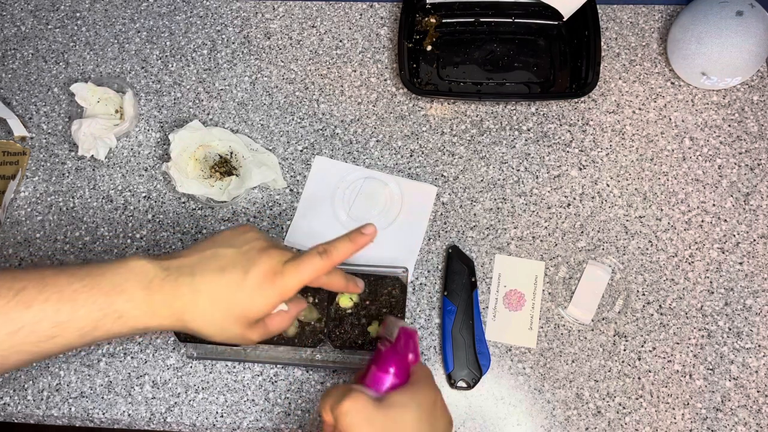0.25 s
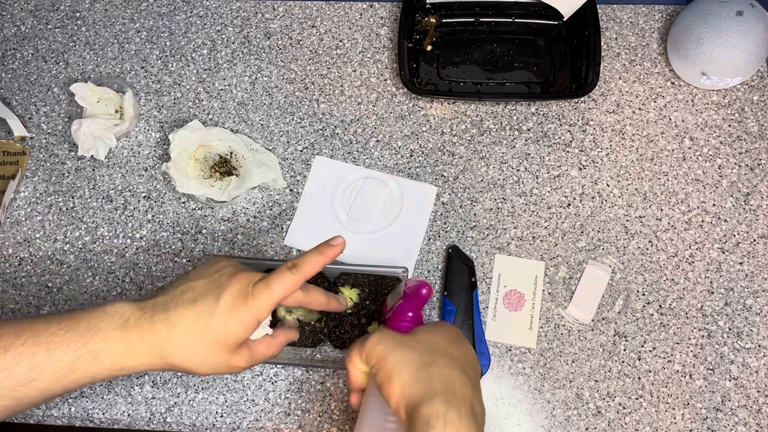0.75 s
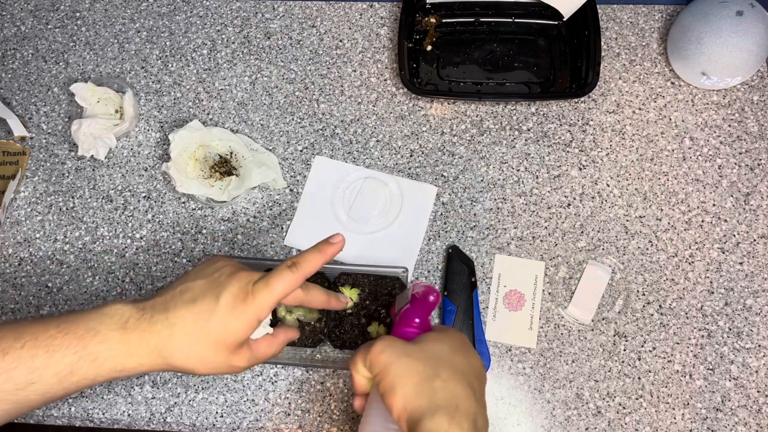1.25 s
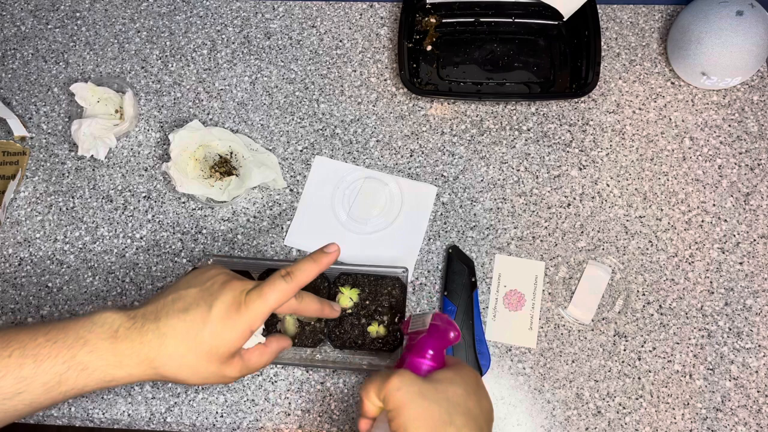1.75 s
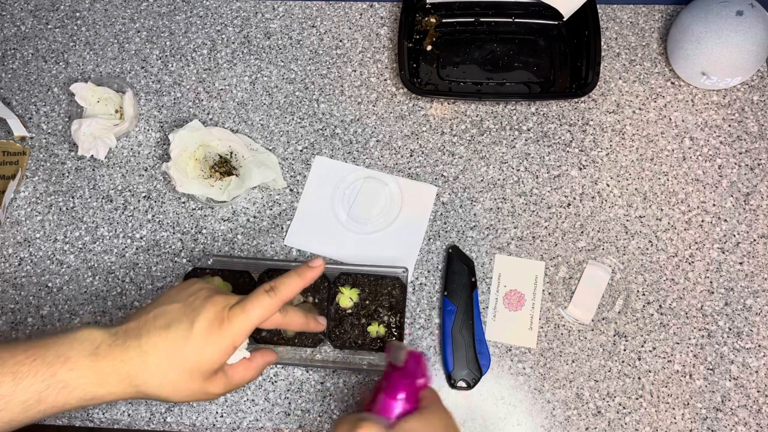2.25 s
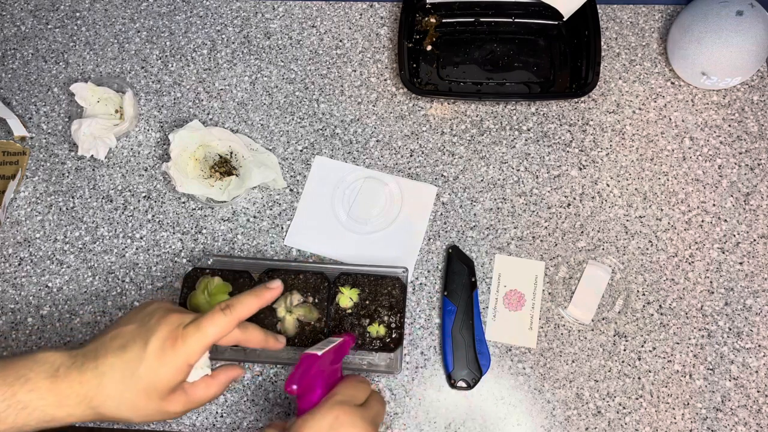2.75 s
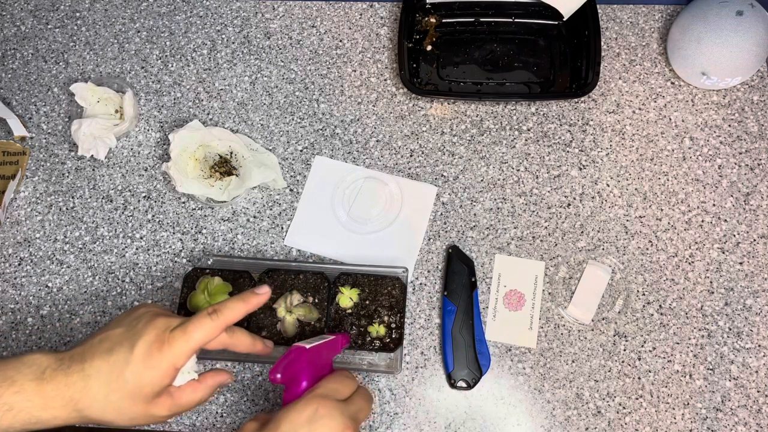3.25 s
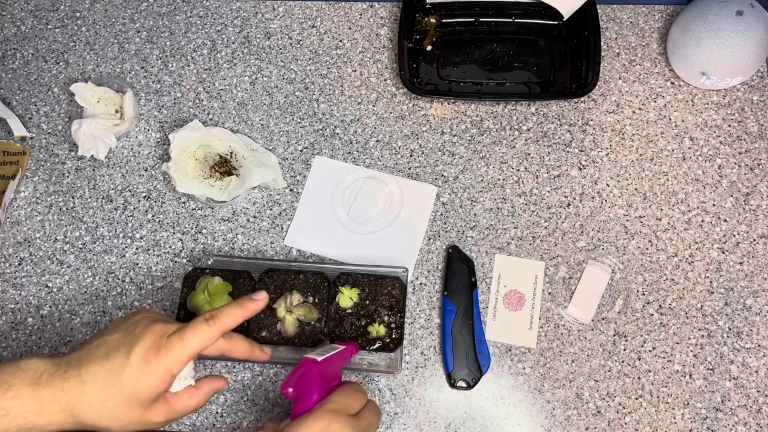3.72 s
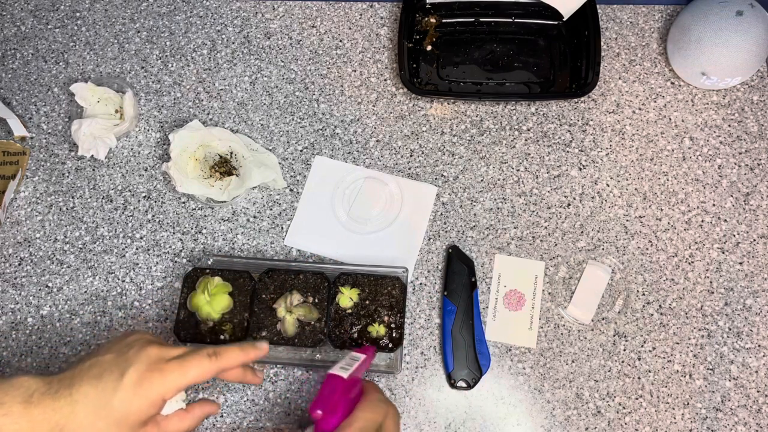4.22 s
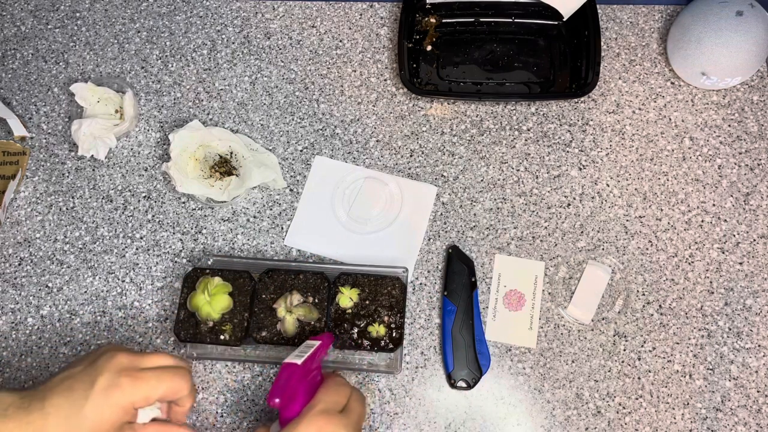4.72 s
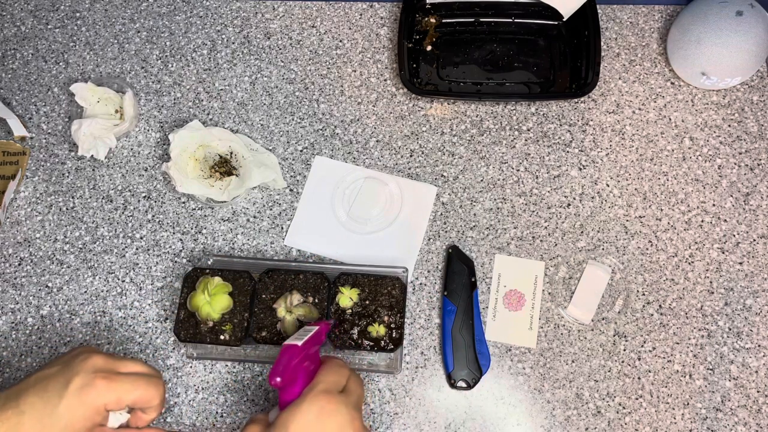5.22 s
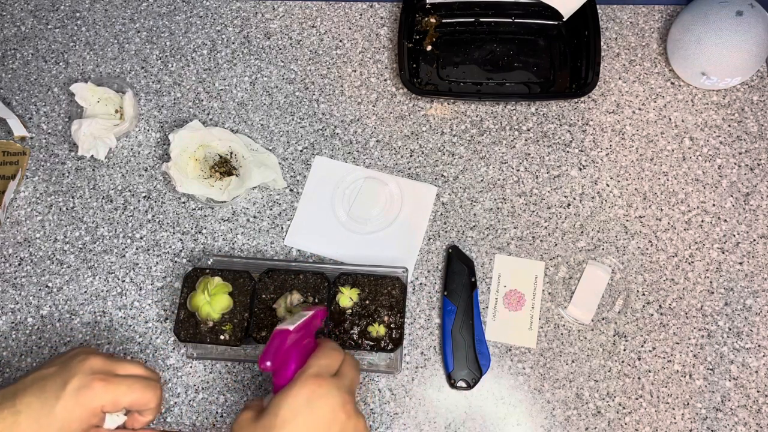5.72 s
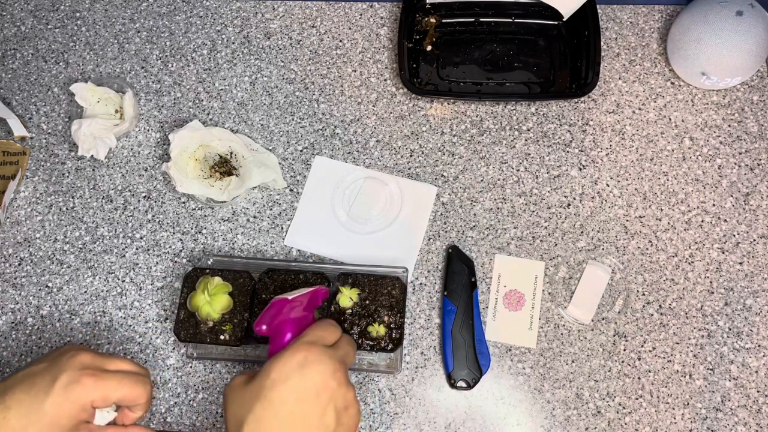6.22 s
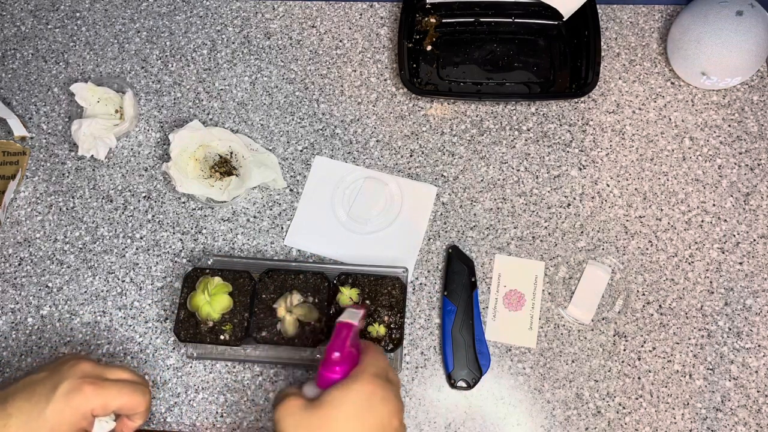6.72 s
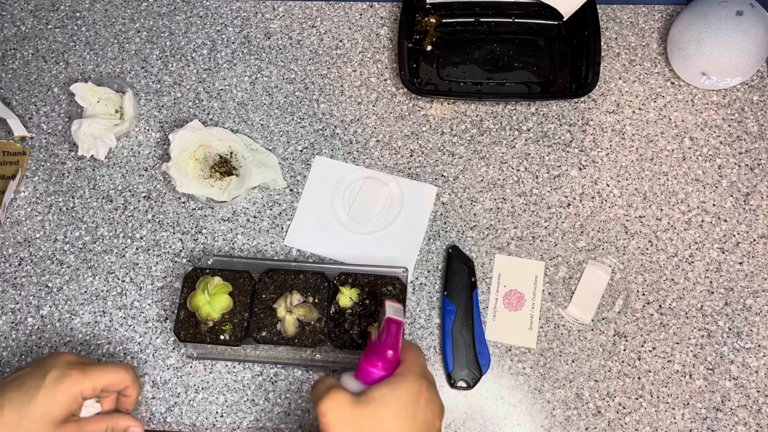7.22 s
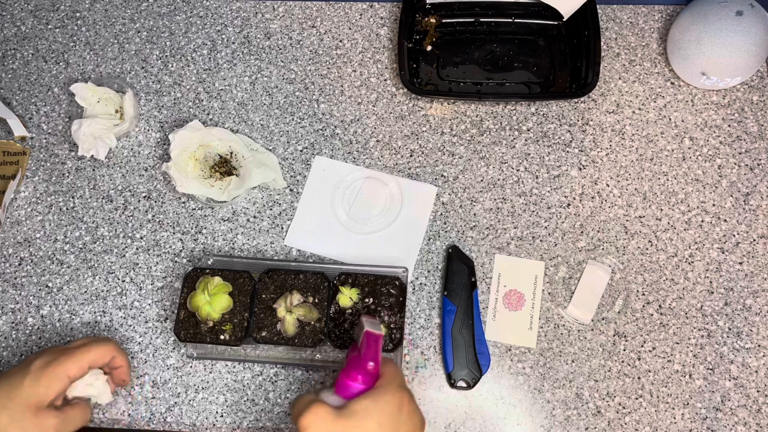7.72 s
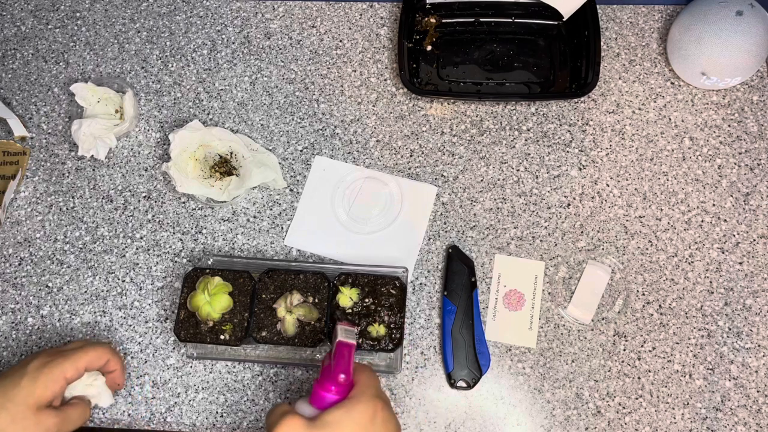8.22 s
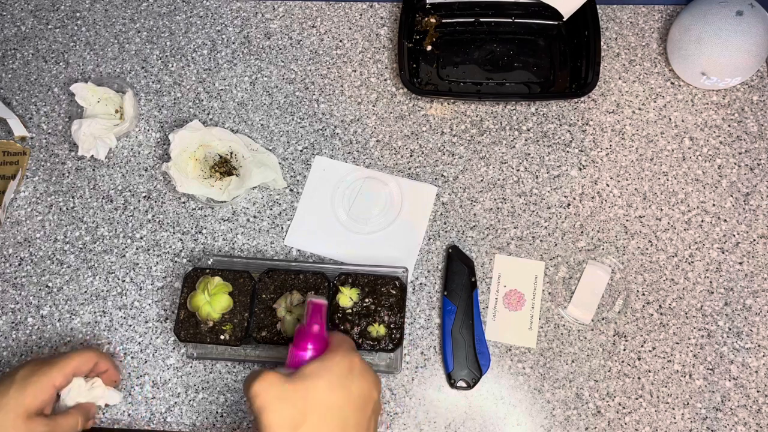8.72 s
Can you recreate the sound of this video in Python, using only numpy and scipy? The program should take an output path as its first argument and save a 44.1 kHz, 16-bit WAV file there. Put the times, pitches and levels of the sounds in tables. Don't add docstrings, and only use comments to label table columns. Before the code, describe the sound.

Squeaky, clacking spray-bottle pulls hiss and patter on soil in a small room, with intermittent cricket chirps and a quiet mains hum behind.

```python
import sys
import numpy as np
from scipy import signal
from scipy.fft import rfft, irfft, next_fast_len
from scipy.io import wavfile
from scipy.ndimage import uniform_filter1d, map_coordinates

SR = 44100
rng = np.random.default_rng(int(sys.argv[2]) if len(sys.argv) > 2 else 0)


def master(y):
    cut = np.clip(np.atleast_2d(y).T, -1, 1)
    pcm = np.round(cut * 32767)
    wavfile.write(sys.argv[1], SR, pcm.astype(np.int16))


def invert_db(x):
    u = np.asarray(x, float) / 20
    return 10 ** u


N = 395123

# first slip in seconds, its peak level in dB,
# wait for the second slip in seconds, its peak level in dB.
SLIPS = [(0.9026, -39, 0.023, -44.5), (1.1981, -34.5, 0.022, -52), (1.521, -41.5, 0.014, -59),
         (1.867, -43.5, 0.017, -58), (2.903, -42.5, 0.015, -46.5), (3.2243, -41, 0.018, -44),
         (3.5181, -39.5, 0.017, -38.5), (3.842, -40, 0.017, -48), (4.8422, -46.5, 0.019, -49),
         (5.1598, -43, 0.015, -43), (5.4436, -41, 0.018, -38.5), (5.722, -43, 0.015, -46),
         (6.0872, -41.5, 0.018, -43.5), (6.441, -44, .018, -38.5), (6.7372, -40, .0173, -38.5),
         (7.0036, -38.5, 0.017, -35), (7.279, -39, .015, -38.5), (7.5443, -39.5, 0.014, -37.5),
         (7.819, -38.5, 0.015, -38), (8.0664, -39, .014, -37.5), (8.5, -48.5, 0.012, -49),
         (8.8054, -35, 0.018, -36)]
PUMP_HZ = 1892


def unit(x):
    return x / np.sqrt(np.mean(x ** 2) + 1e-20)


def along(points, hz):
    f, v = np.transpose(points)
    return np.interp(np.log(hz + 1), np.log(f + 1), v)


def uneven(knots):
    return map_coordinates(rng.standard_normal(size=40), [knots + 2])


def wobble(rate):
    return map_coordinates(rng.standard_normal(size=N // 40), [np.arange(N) * rate / SR])


def filtered(x, response):
    m = next_fast_len(N + SR // 2)
    return irfft(rfft(x, m) * response(np.fft.rfftfreq(m, 1 / SR)), m)[..., :N]


def patchy(x, depth_db):
    z = signal.stft(x, nperseg=256)[2]
    field = rng.standard_normal(z.shape[-2:])
    field = uniform_filter1d(uniform_filter1d(field, size=4, axis=0), size=9, axis=1)
    return signal.istft(z * invert_db(depth_db * unit(field)), nperseg=256)[1][..., :N]


def add(track, s, x):
    part = track[round(s * SR):][:len(x)]
    part += x[:len(part)]


def resonance(hz, centre, width):
    return 1j * hz * width / (centre * centre - hz * hz + 1j * hz * width)


def shell(hz, lift_db):
    # centre in Hz, width in Hz, level in dB.
    modes = [(1476, 50, -8), (1913, 137, -0.5), (2371, 230, -9.5), (3680, 110, -16), (5855, 400, 0),
             (7445, 42, -0.5), (7850, 24, -9), (9140, 37, -4), (10250, 470, -4)]
    return 1 + sum(invert_db(db + lift_db) * resonance(hz, centre, width) for centre, width, db in modes)


def hollow(hz):
    # centre in Hz, width in Hz, level in dB.
    modes = [(620, 120, -31), (1564, 180, 13), (3030, 930, 9.5)]
    return sum(invert_db(db) * resonance(hz, centre, width) for centre, width, db in modes)


def cornered():
    return np.clip((2.4 - np.arange(N) / SR) / .3, 0, 1)


def diffuse(pair):
    # frequency in Hz, correlation from 0 to 1.
    alike = [(60, .99), (170, .92), (350, .75), (700, .3), (2000, .5), (6000, .3), (8500, .9)]

    def turn(f):
        return np.arccos(np.clip(along(alike, f), -1, 1)) / 2

    mid, side = filtered(pair, lambda f: np.array([np.cos(turn(f)), np.sin(turn(f))]))
    return np.array([mid + side, mid - side])


def walls(x, longer):
    # frequency in Hz, 60 dB decay time in seconds.
    decay = [(300, 0.38), (2000, 0.22), (5000, 0.19), (10000, 0.15)]
    wet, step = np.zeros((2, N + SR)), SR // 4
    for start in range(0, N, step):
        noise = rng.standard_normal((2, SR // 3))
        if not x[start:start + step].any():
            continue
        hz, t, z = signal.stft(noise, SR, nperseg=256)
        fade = invert_db(-60 * t / longer / along(decay, hz)[:, None])
        tail = signal.istft(z * fade, SR, nperseg=256)[1]
        tail = tail / np.linalg.norm(tail[0])
        answer = signal.fftconvolve(x[None, start:start + step], tail, axes=1)
        wet[:, start + 120:][:, :answer.shape[1]] += answer
    return wet[:, :N]


def room_tone():
    # time in seconds, frequency in Hz, level in dB.
    drift = [(0.0, 57, -57), (0.05, 58.2, -49.5), (0.85, 59, -52.5), (8.96, 58.73, -52)]
    # frequency in Hz, level in dB.
    air_spectrum = [(25, -37), (45, -4.5), (70, -13), (125, -12), (200, -22), (300, -16), (400, -21),
                    (700, -32.5), (1100, -42), (2000, -47.5), (4000, -54.5), (9000, -58), (10000, -47),
                    (16000, -73)]
    s, hz, db = np.transpose(drift)
    t = np.arange(N) / SR
    level = invert_db(np.interp(t, s, db) + 0.41 * wobble(1.41) + 1.5 * wobble(30))
    hum = np.sqrt(2) * level * np.sin(2 * np.pi * np.cumsum(np.interp(t, s, hz)) / SR)
    air = filtered(rng.standard_normal((2, N)), lambda f: invert_db(along(air_spectrum, f)))
    return hum + unit(diffuse(air)) * invert_db(-58.5 + 0.1 * wobble(15.0))


def cricket():
    # start in seconds, peak level in dB.
    strokes = [(0.5077, -45.5), (1.171, -41.5), (1.216, -36), (1.2752, -34.5), (1.653, -40), (1.6998, -34),
               (1.7603, -33.5), (2.972, -43.5), (3.022, -34.5), (3.094, -39.5), (4.189, -43.5),
               (4.242, -35.5), (4.301, -36), (5.8593, -44.5), (5.917, -35.5), (5.9848, -39.5),
               (6.8066, -42.5), (6.855, -34), (6.916, -34), (8.605, -44.5), (8.814, -42.5)]
    song, rasp = np.zeros((2, N))
    t = np.arange(SR // 40) / SR
    for s, db in strokes:
        effort = np.clip((db + 42.5) / 7, 0, 1)
        teeth, slip = uneven(t * 650), uneven(t * 650)
        hz = 4420 + 60 * effort + 90 * slip
        hz = hz + (110 + 640 * effort) * np.exp(-t / .008) + 400 * effort * np.exp(-t / .0025)
        turn = 2 * np.pi * np.cumsum(hz) / SR
        rise_s, fall_s = 0.0032 + 0.0032 * effort, 0.0066 * (0.7 + 0.83 * effort)
        swell = np.clip(t / rise_s, 0, 1) ** 0.85 * np.exp(-(np.clip(t - rise_s, 0, None) / fall_s) ** 2)
        octave = invert_db(-5.0) * np.clip(t / 0.0038, 0, 1) * np.sin(2 * turn)
        beat = 1 - 0.8 * effort * np.exp(-((t - 0.01095) / 0.00082) ** 2)
        scratch = invert_db(-17.5) * rng.standard_normal(len(t))
        add(song, s, invert_db(db - 4.0) * invert_db(2.3 * teeth) * swell * beat * (np.sin(turn) + octave))
        add(rasp, s, invert_db(db) * (0.48 * swell + np.exp(-((t - .0015) / 0.0019) ** 2)) * scratch)
        opening = np.exp(-((t - .011) / 0.006) ** 2) * rng.standard_normal(len(t))
        add(rasp, s - .035, invert_db(-61.0) * opening)
    ending = np.sin(2 * np.pi * 4600 * t) + 0.75 * np.sin(2 * np.pi * 9200 * t)
    add(song, 0, invert_db(-67.0 - 60 * t / 0.089) * ending)
    return song + filtered(rasp, lambda f: resonance(f, 7400, 2000) ** 2)


def sliding():
    # time in seconds, level in dB.
    shifts = [
        [(2.13, -77), (2.33, -72.5), (2.48, -80)],
        [(8.31, -100), (8.5, -69)],
        [(4.72, -79), (4.83, -93)],
        [(5.6, -70), (5.72, -81)],
        [(5.3, -91), (5.44, -63)],
    ]
    gain = np.zeros(N)
    for shift in shifts:
        s, db = np.transpose(shift)
        t = np.arange(s[0], s[-1], 1 / SR)
        edge = np.clip(np.minimum((t - t[0]) / 0.0054, (t[-1] - t) / 0.049), 0, 1)
        add(gain, t[0], edge * invert_db(np.interp(t, s, db)))
    return gain


def hand():
    # centre in seconds, level in dB, frequency in
    # Hz.
    bottom_outs = [(0.96, -52.5, 230), (0.958, -56, 646), (1.225, -58, 650), (1.262, -54, 670),
                   (1.245, -56, 200), (1.28, -53, 202), (1.57, -59, 620), (1.584, -67, 170), (1.932, -53, 156),
                   (2.94, -58, 244), (3.287, -54, 141), (3.569, -51, 125), (3.894, -51, 135),
                   (4.882, -46.5, 137), (5.211, -50, 148), (5.505, -50.5, 138.6), (5.761, -53.5, 126),
                   (6.131, -53.5, 149), (6.497, -54, 149), (6.782, -52, 133), (7.054, -52.5, 145),
                   (7.311, -55.5, 143.6), (7.606, -49.5, 132), (7.88, -53, 138.6), (8.101, -54, 132),
                   (8.531, -58, 156), (8.914, -51, 143)]
    thuds = np.zeros(N)
    t = np.arange(-SR // 16, SR // 16) / SR
    for s, db, hz in bottom_outs:
        overtone = np.sin(2 * np.pi * 1.937 * hz * t + rng.uniform(0, 7.9))
        sway = np.sin(2 * np.pi * hz * t) + 0.28 * overtone
        sway = sway * (1 + .6 * uneven((t - t[0]) * 120))
        add(thuds, s + t[0], invert_db(db - 1.5) * np.exp(-(t / 0.022) ** 2) * sway)

    def skin_band(f):
        square = (f / 1500) ** 2
        return square / (1 + square) / (1 + (f / 2400) ** 16)

    skin = filtered(rng.standard_normal(N), skin_band)
    return thuds + invert_db(-4.0 + 0.44 * wobble(42)) * sliding() * unit(skin)


def taps():
    # start in seconds, level in dB, centre in Hz, width in Hz.
    ticks = [(0.316, -60.5, 1820, 600), (0.359, -57, 9900, 2500), (0.375, -67, 5700, 2000),
             (.382, -52, 5060, 1520), (0.4412, -48, 3400, 2000), (0.444, -56, 1900, 800),
             (0.455, -49.5, 7400, 2000), (.492, -55, 2330, 350), (.5065, -52, 1800, 500),
             (.5245, -60, 6500, 2000), (0.537, -52, 1680, 600), (0.84, -66, 2600, 2500),
             (1.756, -53, 7500, 2000), (1.81, -61, 2600, 2500), (1.958, -51, 5500, 400),
             (1.967, -55, 5400, 400), (0.8177, -51, 1620, 500), (2.7507, -59, 1900, 500),
             (2.7641, -57, 1900, 450), (4.065, -55, 3000, 3000), (7.425, -54, 1900, 500),
             (7.692, -53, 1900, 500), (1.0815, -48, 6000, 500), (1.386, -54, 5900, 500),
             (3.695, -50, 6070, 500), (8.705, -51, 5950, 500), (1.9875, -55, 1800, 600),
             (3.272, -51, 3770, 500), (6.825, -51, 2600, 2500), (7.634, -56, 3000, 2500),
             (7.654, -59, 2500, 2500), (.6894, -55, 7300, 2500), (1.4264, -51, 6540, 4020),
             (2.1363, -54.5, 1930, 700), (2.28, -53, 5000, 2500), (2.358, -55.5, 3120, 1010),
             (2.4068, -63, 2980, 3000), (2.4626, -61.5, 5000, 3500), (2.4864, -48.5, 1010, 700),
             (3.1505, -52, 5600, 1500), (4.017, -54, 6010, 1200), (4.06, -46.5, 2930, 1500),
             (7.485, -58.5, 7300, 4030), (8.7366, -48.5, 5600, 3000), (8.7915, -73, 7400, 800)]
    out, t = np.zeros(N), np.arange(SR // 12) / SR
    for s, db, hz, width_hz in ticks:
        b, a = signal.iirpeak(hz, hz / width_hz, SR)
        burst = rng.standard_normal(len(t)) * (np.exp(-(t / 0.0017) ** 2) + invert_db(-9 - 60 * t / 0.069))
        burst = signal.lfilter(b, a, signal.lfilter(b, a, burst))
        add(out, s, invert_db(db) * burst * 9 / np.linalg.norm(burst[:SR // 150]))
    return out


def thumps():
    # centre in seconds, peak level in dB.
    blips = [(0.9258, -44), (0.9393, -43), (0.9502, -54), (0.9584, -46), (0.966, -45), (1.2193, -37),
             (1.2287, -48), (1.235, -39), (1.2622, -35.5), (1.539, -39), (1.5518, -51), (1.5616, -42),
             (1.8856, -40), (1.897, -43), (1.9066, -45), (2.9213, -46), (2.9337, -43), (3.2575, -46),
             (3.5378, -51), (3.5461, -46), (3.5553, -51), (3.5691, -50), (3.5819, -43.5), (3.8626, -51),
             (3.8748, -45.5), (4.8726, -44), (5.1767, -53), (5.1898, -50), (5.2048, -40.5), (5.4622, -51),
             (5.4778, -45), (5.484, -45), (5.493, -41), (5.74, -45), (6.1068, -44), (6.46, -46),
             (6.4738, -43), (6.4828, -46), (6.7564, -36), (6.77, -38), (7.0215, -44.5), (7.0347, -45),
             (7.0449, -41), (7.297, -44.5), (7.3062, -44), (7.5605, -44), (7.5693, -47), (7.576, -41),
             (7.586, -52), (7.5943, -42), (7.8357, -39), (7.8484, -40), (7.8652, -42), (8.0827, -46),
             (8.0954, -49), (8.5204, -45), (8.8345, -38), (8.8435, -49), (8.8577, -53), (8.87, -42)]
    out, t = np.zeros(N), np.arange(-SR // 100, SR // 50) / SR
    for (s, db), (pitch, turn) in zip(blips, rng.standard_normal((len(blips), 2))):
        hz = (1600 if s < 2.2 else PUMP_HZ) * (1 + 0.04 * pitch)
        shape = np.exp(-(t / 0.0018) ** 2) + 0.22 * (t > 0) * np.exp(-t / .005)
        tone = np.sin(2 * np.pi * hz * t + turn) + 0.38 * np.sin(2 * np.pi * 1.277 * hz * t)
        add(out, s + t[0], invert_db(db - 5) * shape * tone)
    return out


def clicks():
    # start in seconds, peak level in dB, knock
    # in dB.
    lever_ticks = [(.4605, -52, 8), (.508, -69, 13.5), (.5232, -59, 10), (.5371, -60.5, 23), (.893, -92, 34),
                   (1.4685, -78, 35), (1.788, -63.5, 18.5), (1.9878, -59, 3.5), (2.0846, -56.5, 1),
                   (2.28, -64, 0), (2.36, -68, -10), (2.4779, -60, 8), (2.5287, -71, -7), (3.096, -50, -33),
                   (4.0607, -41, -0.5), (4.612, -60, 1), (7.2164, -65, 4), (8.2989, -43, -6),
                   (3.931, -57.5, -17),
        (6.649, -64, -7),
        (7.096, -59.5, 12.5),
    ]
    # start in seconds, peak level in dB.
    judder = [(0.9377, -32), (0.946, -45), (1.231, -38), (1.245, -44), (1.5504, -44), (1.8903, -55),
              (2.9297, -35), (3.2537, -42), (3.552, -34), (3.5666, -52), (3.87, -36), (4.8478, -38),
              (4.869, -41), (5.1883, -29.5), (5.199, -48), (5.475, -34), (5.4914, -33.5), (5.506, -39),
              (5.5195, -59), (5.7468, -38), (6.1183, -34), (6.1273, -42), (6.4458, -39), (6.471, -35),
              (6.482, -38), (6.7689, -33), (6.7801, -31), (7.0327, -31.5), (7.284, -33.5), (7.302, -47),
              (7.308, -52), (7.571, -50), (7.5833, -32), (7.8466, -30), (7.8564, -42), (8.0938, -43),
              (8.1034, -50), (8.131, -42), (8.8383, -28), (8.8466, -40), (8.8535, -31), (8.8612, -33),
              (8.8674, -36), (8.8785, -30.5)]
    first_knocks_db = [-4, -1.5, -0.5, 6, -5, -5, -5, -8, -4, -3, -5, -4, -6, -4, -3.5, -5, -5.5, -2.5,
                       -2.5, -4, 2, -13]
    # start in seconds, peak level in dB, knock in dB.
    returns = [(0.74, -44, -1), (1.0808, -44.5, 0), (1.3831, -44.5, -0.5), (1.7146, -46, 0),
               (2.047, -48.5, 6.5), (2.7515, -46.5, -1), (3.1151, -43.5, -5), (3.4029, -48, 5),
               (3.694, -47.5, -0.5), (4.0163, -58.5, 4.5), (4.698, -50.5, 0.5), (5.04, -50.5, -0.5),
               (5.32, -48, -1.5), (5.591, -54, 1.5), (5.9304, -54.5, -2), (6.274, -61.5, 7.5),
               (6.6076, -51.5, 5), (6.898, -51.5, 2.5), (7.17, -53.5, 3.5), (7.4331, -47.5, 1),
               (7.699, -47, 2.5), (7.976, -46.5, 0), (8.2132, -46.5, -1), (8.704, -48.5, 0)]
    # start in seconds, level in dB.
    valves = [(0.8176, -45.5), (1.151, -43), (1.411, -42.5), (1.7382, -40.5), (2.062, -39.5), (2.7635, -46),
              (3.124, -46.5), (4.042, -60), (4.688, -51.5), (5.026, -60), (5.303, -57), (5.899, -63),
              (6.5912, -51.5), (7.1503, -55), (7.4234, -55), (7.69, -52), (7.9687, -49), (8.2005, -54),
              (8.6966, -50)]
    slip_knock_db, valve_dull_db = -5.5, 30
    rows = lever_ticks + [(s, db - 7.5, slip_knock_db) for s, db in judder]
    for (s, db, wait, next_db), knock_db in zip(SLIPS, first_knocks_db):
        rows = rows + [(s, db, knock_db), (s + wait, next_db, slip_knock_db)]
    return rows + returns + [(s, db - valve_dull_db, valve_dull_db) for s, db in valves]


def lever_knocks():
    # time in seconds, peak level in dB, frequency in Hz.
    blows = [
        (2.4876, -48, 902),
        (2.497, -52, 950),
        (2.595, -47, 918),
        (2.613, -56, 930),
        (2.628, -62, 900),
        (8.667, -55.5, 1060),
        (8.664, -51, 1600),
    ]
    # ratio to the knock's frequency, level in dB.
    modes = [(.78, -5), (1.001, 1.5), (1.115, 10), (1.25, -5)]
    out, t = np.zeros(N), np.arange(SR // 12) / SR
    for s, db, hz in blows:
        ring = sum(invert_db(level) * np.sin(2 * np.pi * share * hz * t) for share, level in modes)
        ring = ring * (1 + .4 * unit(uniform_filter1d(rng.standard_normal(len(t)), size=60)))
        add(out, s - .001, invert_db(db - 13 - 60 * t / 0.05) * (1 - np.exp(-t / 0.001)) * ring)
    return out


def trigger():
    # frequency in Hz, level in dB.
    snap = [(800, -13.5), (1250, -18), (1450, -6.5), (3000, -6.5), (6000, -5.5), (9000, 1.5), (11000, 0),
            (13000, -33), (16000, -4)]
    snaps, knocks, stroke, rub = np.zeros((4, N))
    t = np.arange(SR // 12) / SR
    for s, db, knock_db in clicks():
        crack, rattle = invert_db(-3 - 60 * t / .004), invert_db(-5 - 60 * t / .075)
        scrape = rng.standard_normal(len(t)) * (crack + np.exp(-(t / .0035) ** 2) + rattle)
        scrape = scrape * invert_db(3 * np.clip(t / .008, 0, 1) * uneven(t * 300))
        scrape = scrape * 9 / np.linalg.norm(scrape[:SR // 150])
        add(snaps, s, invert_db(db) * scrape)
        add(knocks, s, invert_db(db + knock_db - 60 * t / 0.12) * scrape * (1 - np.exp(-t / 0.0011)))
    for s, db, *_ in SLIPS:
        add(stroke, s, np.exp(-(t / .009) ** 4))
        add(rub, s, invert_db(db - 16) * np.exp(-(t / 0.027) ** 4) * rng.standard_normal(len(t)))

    def low(hz):
        return 1 / (1 + (hz / 3800) ** 6)

    corner = cornered()
    bright = filtered(snaps, lambda hz: invert_db(5.0 + along(snap, hz)) * shell(hz, lift_db=5.5) * (1 - low(hz)))
    dull = filtered(knocks, lambda hz: invert_db(14.5 + along(snap, hz)) * shell(hz, lift_db=7.0) * low(hz))
    dull = invert_db(-3 * corner) * dull + invert_db(-9.0) * corner * filtered(knocks, hollow)
    driven = stroke * knocks + rub * invert_db(3.3 * wobble(150))
    head = filtered(driven, lambda hz: resonance(hz, PUMP_HZ, 460) ** 2)
    return bright + dull + invert_db(12) * (1 - corner) * head + lever_knocks()


def flow():
    # start in seconds, pressure build in seconds, hold in seconds,
    # mist level in dB, level of water on soil in dB.
    quick = [(0.895, 0.043, 0.043, -58, -50), (1.196, 0.028, 0.081, -50, -45.5),
             (1.516, 0.03, 0.097, -49.5, -48), (1.861, 0.012, 0.099, -54.5, -46.5),
             (2.891, 0.063, 0.067, -55, -57.5), (3.216, 0.042, 0.018, -53, -51),
             (3.527, 0.04, 0.021, -53, -51.5), (3.833, 0.039, 0.0055, -55, -53),
             (4.834, 0.02, 0.078, -61.5, -57), (5.15, 0.057, .005, -53.5, -54),
             (5.429, 0.096, .005, -77, -60), (5.711, 0.035, 0.077, -62.5, -57.5),
             (6.082, 0.039, .005, -56, -53), (6.435, 0.036, 0.019, -57, -53.5),
             (6.735, 0.041, 0.0077, -59, -54), (7.009, 0.016, 0.0044, -51.5, -46.5),
             (7.272, 0.028, 0.004, -47.5, -49.5), (7.535, 0.039, 0.0044, -50.5, -50),
             (7.816, 0.013, 0.064, -54.5, -47.5), (8.058, 0.019, 0.034, -50.5, -50),
             (8.489, 0.097, 0.028, -59, -59.5), (8.796, 0.088, 0.015, -59.5, -50)]
    # start, build and hold in seconds, mist and soil levels in dB.
    gentle = [
        (0.438, 0.17, 0.042, -52, -64.5),
        (2.471, 0.12, 0.05, -51, -79),
        (4.489, 0.052, 0.051, -61.5, -69.5),
    ]
    fall_db_per_s = 360
    mist, soil = np.zeros((2, N))
    t = np.arange(SR // 2) / SR
    for s, build, hold, mist_db, soil_db in quick + gentle:
        held = np.clip(t - build, 0, None)
        free = np.clip(held - hold, 0, None)
        sag_db = 17 * held + fall_db_per_s * free
        add(mist, s, np.clip(t / build, 0, 1) ** 2.44 * invert_db(mist_db - sag_db))
        rise, pool, trim_db = 0.047, 0.047, 0
        if .8 < s < 2.2:
            rise, pool, trim_db = 0.025, 0.055, -2.5
        soak_db = 11 * np.clip(t - pool, 0, None) / build
        add(soil, s, np.clip(t / rise, 0, 1) * invert_db(soil_db + trim_db - soak_db - fall_db_per_s * free / 2))
    for s, _, wait, _ in SLIPS:
        caught = slice(round(s * SR), round((s + wait) * SR))
        mist[caught] *= invert_db(-6)
        soil[caught] *= invert_db(-3)
    return mist, soil


def spray():
    # frequency in Hz, level in dB.
    mist_spectrum = [(2000, -16.5), (3500, -6), (5000, -7.5), (7000, -6), (9000, 4.5), (10500, 4),
                     (16000, -8.5)]
    # frequency in Hz, level in dB.
    soil_spectrum = [(90, -6), (160, 1), (300, -2), (700, -4.5), (1200, -12), (1400, -2.5), (1900, -6),
                     (2400, -6.5), (3500, -5.5), (5000, -15)]
    mist, soil = flow()
    sputter = invert_db(1.3 * wobble(140) + 1.3 * wobble(700))
    jet = patchy(sputter * rng.standard_normal(N), depth_db=3.0)
    hiss = filtered(jet, lambda hz: invert_db(along(mist_spectrum, hz)) * shell(hz, lift_db=0.5))
    drops = rng.standard_normal((2, N)) * (rng.random(N) < .4) * invert_db(2.0 * wobble(160))
    drops[1] = .6 * drops[0] + .8 * drops[1]
    splashes = patchy(drops, depth_db=1.8)
    patter = filtered(splashes, lambda hz: invert_db(along(soil_spectrum, hz)) * shell(hz, lift_db=1.5))
    near = cornered()
    ringing = invert_db(-3.5) * near * unit(filtered(drops, hollow))
    return invert_db(7.5) * mist * unit(hiss) + soil * (invert_db(3.5 - 0.41 * near) * unit(patter) + ringing)


def scene():
    bottle = spray() + trigger() + hand() + taps() + thumps()
    insect = cricket()
    echoes = invert_db(-5.5) * walls(bottle[0], longer=1)
    echoes = echoes + invert_db(-8.5) * walls(insect * (abs(insect) > 1e-7), longer=1.3)
    return bottle + insect + diffuse(echoes) + room_tone()


def ports(x):
    # frequency in Hz, phase in radians.
    lead = [(1000, 0), (1400, .6), (2000, -.3), (3000, 1.03), (4800, 1.07), (6900, .6), (7500, 1.1),
            (8600, 0), (10000, -3), (10500, -3.3), (12000, -6.3), (12500, -6.3), (13200, -9.4),
            (14100, -9.4), (14900, -12.6)]
    # frequency in Hz, difference in dB.
    lean = [(60, 1.6), (200, 1.3), (700, 5), (1050, 1), (1450, 4), (2700, 2.5), (4800, 8), (6500, 3.5),
            (7200, 6), (8400, 0)]
    side = np.array([[.5], [-.5]])
    return filtered(x, lambda hz: invert_db(side * along(lean, hz)) * np.exp(1j * side * along(lead, hz)))


def top_cut(x):
    return signal.sosfilt(signal.butter(12, 16520, fs=SR, output="sos"), x)


def record(dry):
    # frequency in Hz, level in dB.
    response = [(25, -0.5), (9300, -0.5), (10600, 0.2), (11300, 0.2), (11800, -4), (12800, -8), (13800, -9),
                (14800, -12), (15600, -12), (16300, -30), (16500, -64)]
    heard = filtered(ports(dry), lambda hz: invert_db(along(response, hz)))
    return top_cut(heard)


dry = scene()
out = record(dry)
master(out)
```